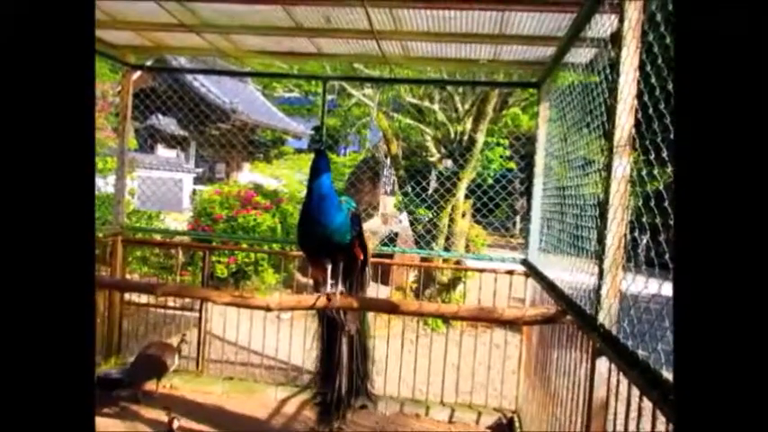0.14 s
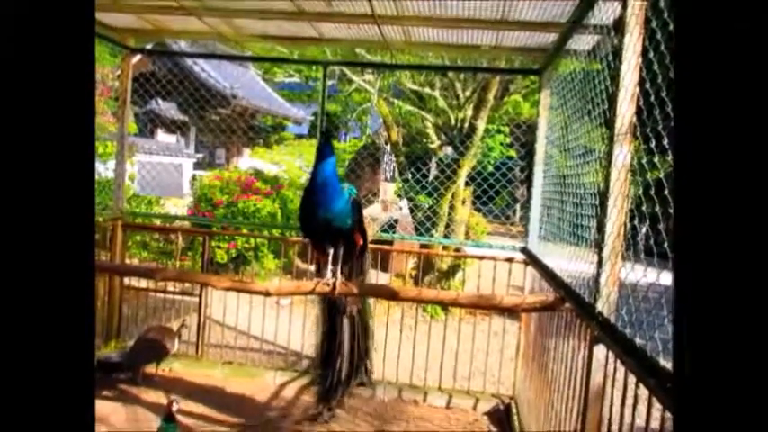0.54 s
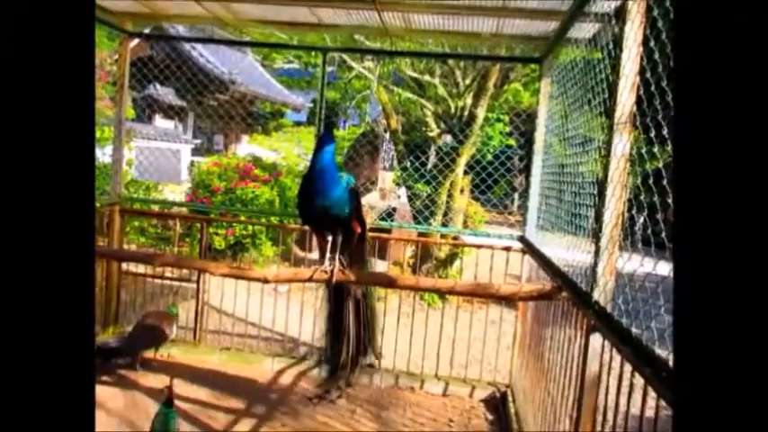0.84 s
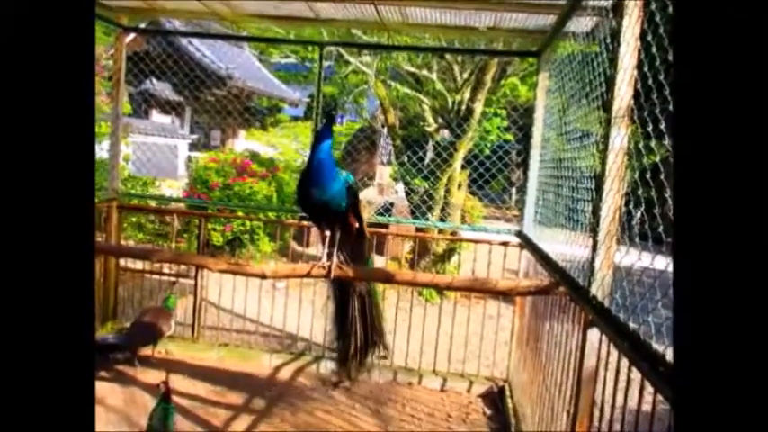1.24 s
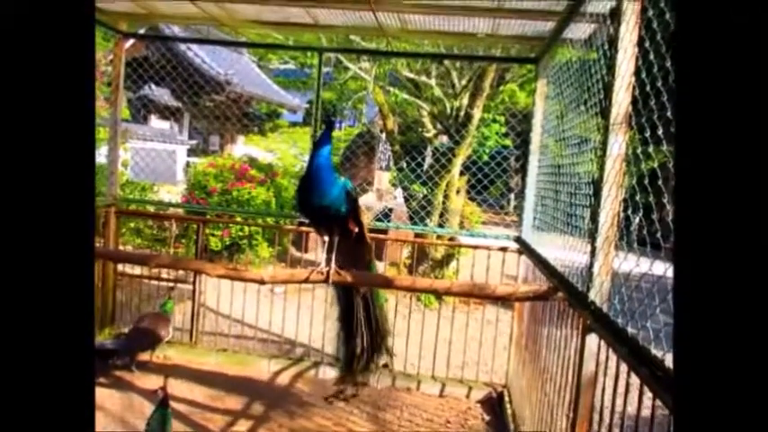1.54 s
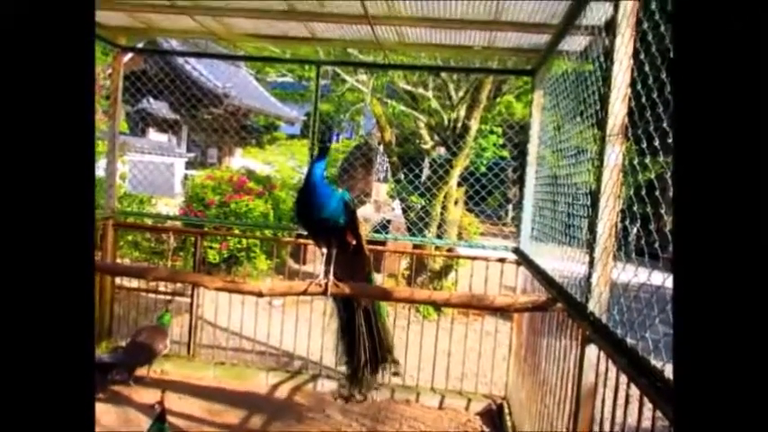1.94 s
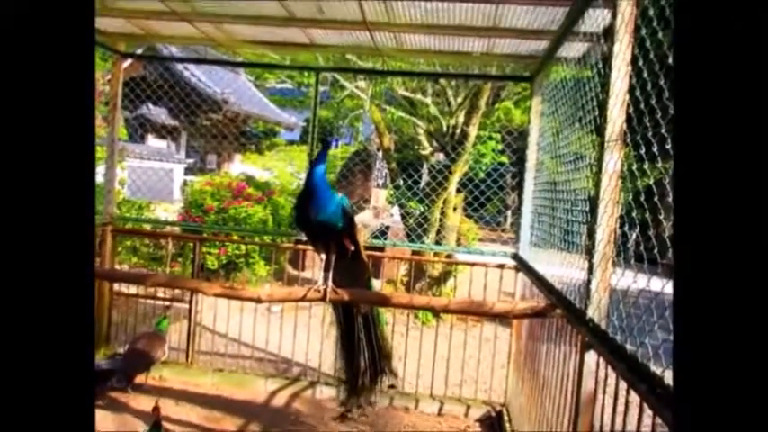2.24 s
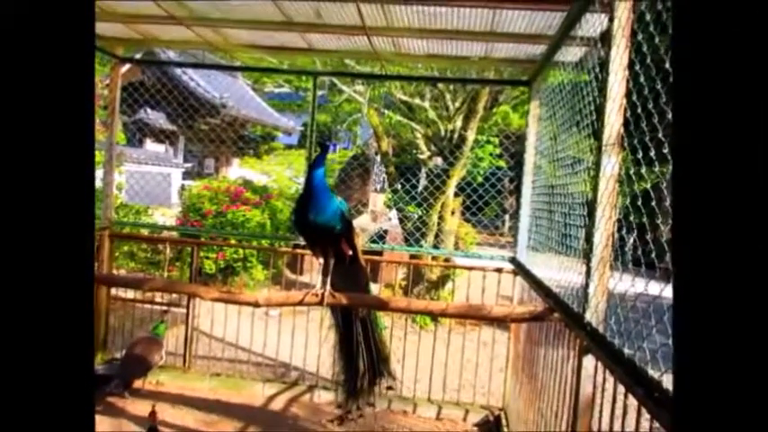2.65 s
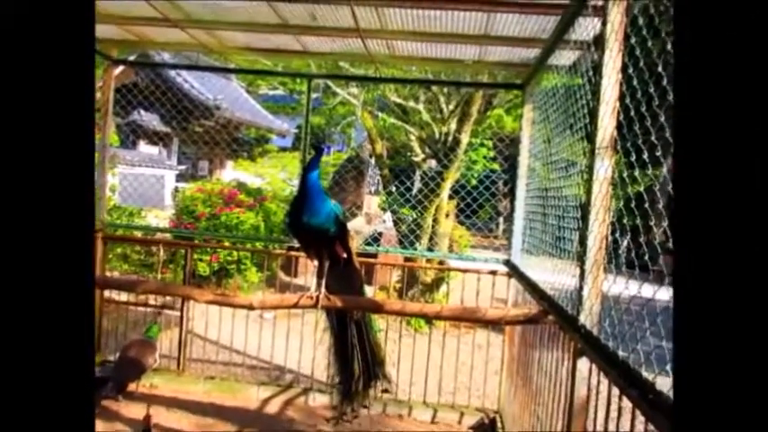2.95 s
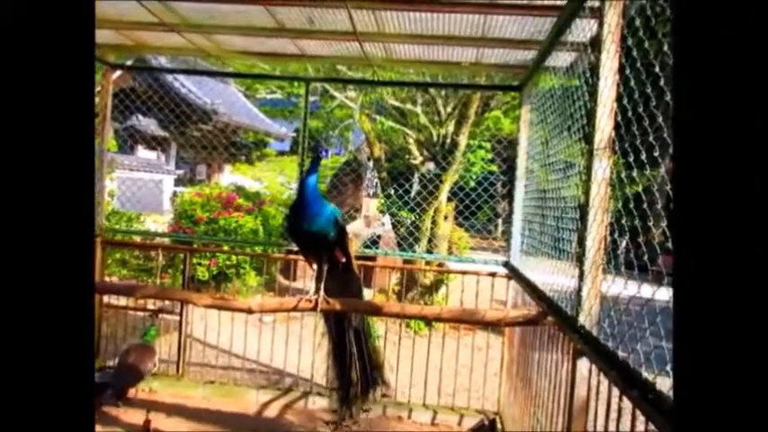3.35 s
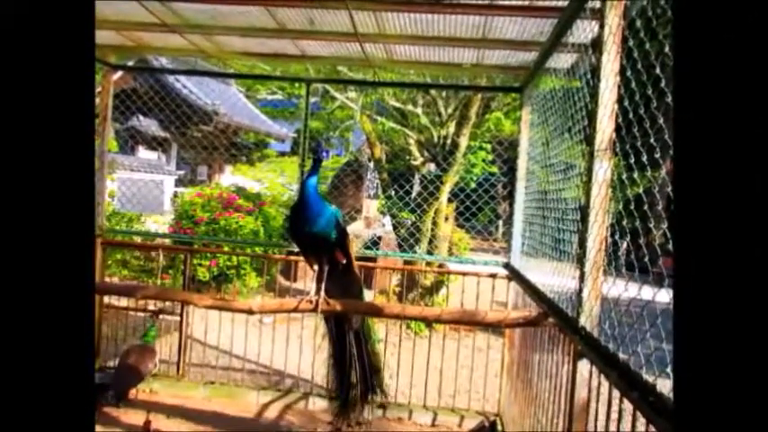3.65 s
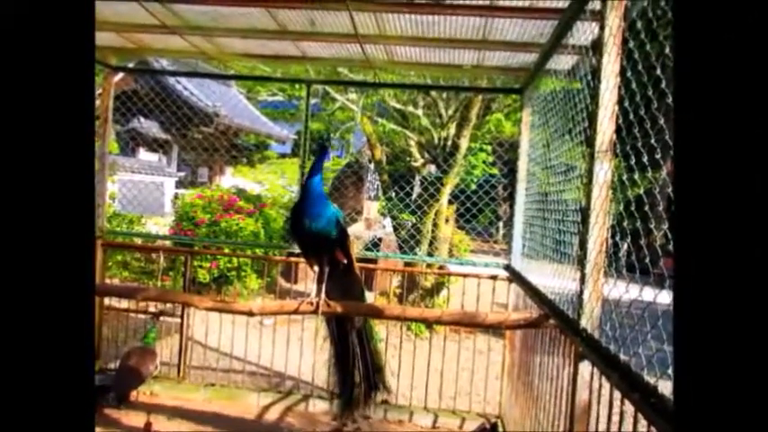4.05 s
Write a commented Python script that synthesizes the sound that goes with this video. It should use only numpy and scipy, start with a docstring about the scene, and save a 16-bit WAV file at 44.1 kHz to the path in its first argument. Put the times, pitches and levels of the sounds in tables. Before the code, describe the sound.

A close, loud peacock calls over soft background noise that becomes fainter early on. First come clipped nasal honks, a burst of air and sharp yelps, then a hoarse, trembling short cry. After a brief gap it wails twice, nasal at first and then higher and open, with a quiet pause between. Hard surfaces nearby add quick reflections and a light outdoor tail.

```python
"""Background noise rumbles and hisses; from a perch in a wire-mesh aviary a peacock gives a nasal double honk,
then coughs of air around a double yelp, while the background noise drops to a fainter level and stays there.
A short fluttering cry follows, then two long two-syllable wails that break upward and collapse at the end.
The voice is a stack of harmonics weighted by throat and beak, roughened by uneven cycles and hissing air;
each call is followed by early echoes, a brief dense scatter and a long faint ring."""
import sys
import numpy as np
from scipy import signal
from scipy.fft import rfft, irfft
from scipy.io import wavfile

SR = 44100
rng = np.random.default_rng(int(sys.argv[2]) if len(sys.argv) > 2 else 0)


def unload_audio(sound):
    """Save the sound as a 16-bit wav file, at the path given as the first command line argument."""
    columns = np.transpose(np.atleast_2d(sound))
    # keep every value between -1 and 1, then stretch to whole-number steps
    steps = np.round(np.clip(columns, -1, 1) * 32767)
    wavfile.write(sys.argv[1], SR, steps.astype(np.int16))


N = 185440
TIME = np.arange(N) / SR

# relative weights of the upper harmonics in the clipped notes and the short cry: f/Hz, level/dB
CRY_TREBLE_COLOUR = [(4000, 11.5), (5100, -8.5), (5800, -4.5), (6400, -12.5), (7200, -4), (8000, -8),
                     (9000, -9), (11500, -10.5), (14500, -27.5), (15500, -31.5)]

# settings shared by the cries: the quick attack, and the collapse of pitch and roughness at the end
CRY_ATTACK_DB = 9.5
COLLAPSE_S, COLLAPSE_HZ, COLLAPSE_ROUGH = 0.016, 63.6, 0.24


def from_db(db):
    """Decibels become an amplitude ratio by the logarithmic law of level."""
    return 10 ** (np.asarray(db) / 20)


def rms_one(x):
    """Normalises a signal to unit mean-square power."""
    return x / np.sqrt(np.mean(x ** 2) + 1e-20)


def at_hz(points, hz):
    """Interpolates a spectrum in dB along a logarithmic frequency axis, on which octaves are equal steps."""
    f, db = np.transpose(points)
    return np.interp(np.log(np.maximum(hz, 1)), np.log(f), db)


def butter(x, hz, kind, order=2):
    """Linear filtering with a maximally flat passband."""
    return signal.sosfilt(signal.butter(order, hz, kind, fs=SR, output="sos"), x)


def coloured_noise(spectrum, size=N):
    """Spectral shaping: white noise is weighted in frequency and brought to rms 1."""
    hz = np.fft.rfftfreq(size, 1 / SR)
    white = rfft(rng.standard_normal(size))
    return rms_one(irfft(white * from_db(at_hz(spectrum, hz)), size))


def wobble(rate_hz, size):
    """Low-passed noise as a random modulator, at most one second long, with rms 1 over that second."""
    slow = butter(rng.standard_normal(SR + SR // 4), rate_hz, "low")
    return rms_one(slow[-SR:])[:size]


def share(weights):
    """Power addition: scales a group of harmonics to a joint power of 1."""
    return weights / np.sqrt(np.sum(weights ** 2, axis=0) + 1e-20)


def ramp(t, start, length):
    """A linear transition from 0 to 1 over a given time."""
    return np.clip((t - start) / length, 0, 1)


def bump(t, centre, half_length):
    """A Gaussian swell of height 1; half_length is its standard deviation."""
    return np.exp(-((t - centre) / half_length) ** 2 / 2)


def blend(a, b, amount):
    """Linear interpolation from a to b as the amount goes from 0 to 1."""
    return a + (b - a) * amount


def between(start, end):
    """The sample times of one call on the discrete time axis."""
    return TIME[(TIME >= start) & (TIME <= end)]


def background():
    """Broadband ambient noise, low-passed more once its level drops, with a faint narrow-band drone."""
    # relative spectral density of the background noise: f/Hz, level/dB per Hz
    background_colour = [(25, -25), (60, 3), (90, -9.5), (118, 2), (150, -3.5), (290, 2.5), (430, -7.5),
                         (1100, -7.5), (2200, -11), (3600, -16), (5500, -26.5), (10500, -30),
                         (13000, -44.5), (15500, -47.5)]
    dropped = ramp(TIME, 0.62, 0.057)
    level = from_db(blend(-42.5, -58.5, dropped))
    air = coloured_noise(background_colour)
    dull = butter(air, 8300, "low", order=1)
    brightness = level / level.max()
    drone = rms_one(butter(rng.standard_normal(N + SR), [60, 69], "band")[SR:])
    return level * (dull + brightness * (air - dull)) + from_db(-80.0) * drone


def call(t, controls, treble_colour, beak_width_at_2800_hz, jitter, rasp,
         flutter=0., flutter_hz=39., crest_s=0., doubling_db=-70, waver_depth_db=2.0):
    """Source and filter: the syrinx buzzes, throat and beak weight its harmonics, strain roughens the cycles."""
    # relative spectral density of the hiss of air in the throat: f/Hz, level/dB per Hz
    air_colour = [(150, -17), (600, -8.5), (1400, -11), (2800, -4.5), (4500, 4), (8000, 3.5), (11500, -2),
                  (15000, -13.5)]
    attack_s, release_s = .003, 0.0035
    notch_hz, notch_width_hz, notch_db = 3970, 75, 12
    span = (TIME >= t[0]) & (TIME <= t[-1])
    size = len(t)
    pitch, level_db, low_db, octave_db, beak_hz, beak_db, treble_db, rough = controls

    # in a flutter the membranes tighten slowly and slip back; they also tremble at random
    turn = 2 * np.pi * flutter_hz * (t - crest_s)
    slip = (flutter > 0) * ((1 + np.cos(turn)) / 2) ** 2
    pitch = pitch * (1 - flutter * (np.sin(turn) + 0.55 * np.sin(2 * turn)))
    rough = rough + 0.035 * slip
    trembling_pitch = pitch * (1 + jitter * rough * wobble(180, size))
    phase = 2 * np.pi * np.cumsum(trembling_pitch) / SR
    k = np.arange(1, 27)[:, None]   # harmonic numbers
    hz = k * pitch

    # the beak resonance picks out the middle harmonics, whose levels waver slowly and independently
    beak_width = beak_width_at_2800_hz * (beak_hz / 2800) ** 2   # sharper the lower it lies
    waver_db = waver_depth_db * np.array([wobble(16, size) for _ in k])
    resonance = 1 / (1 + ((hz - beak_hz) / beak_width) ** 2)
    below_treble = 1 / (1 + (hz / 3620) ** 20)
    beak = share((k > 2) * from_db(waver_db) * resonance * below_treble)

    # above it stands a comb that brightens as the pitch first climbs, and dulls on any low note
    octaves_up = np.log2(hz / 4200)
    slack_db = -4.0 * np.clip((760 - np.maximum.accumulate(pitch)) / 100, 0, 2) * octaves_up
    slack_db += -2.5 * np.clip((690 - pitch) / 60, 0, 2) * octaves_up
    above_beak = 1 / (1 + (4280 / hz) ** 20)
    treble = share(from_db(at_hz(treble_colour, hz) + slack_db + waver_db) * above_beak)

    # every slip of the membranes weakens the harmonics above the fundamental
    height = (k == 1) * from_db(low_db) + (k == 2) * from_db(octave_db - 4.0 * slip)
    height = height + beak * from_db(beak_db - 7 * slip) + treble * from_db(treble_db - 6.8 * slip)
    # any harmonic passing near 4 kHz is weakened by a narrow notch
    height = height * from_db(-notch_db * bump(hz, notch_hz, notch_width_hz))
    # each harmonic starts at a random phase, so the wave is full rather than spiky
    harmonics = np.cos(k * phase + rng.uniform(0, 2 * np.pi, k.shape))
    voice = np.sqrt(2) * np.sum(height * harmonics, axis=0)

    # uneven cycles put skirts on the lines, and air hisses through on every opening
    voice *= 1 + 0.074 * rough * wobble(110, size)
    air = coloured_noise(air_colour, size=SR)[:size] * (1 + np.cos(phase))
    voice += rasp * rough * from_db(treble_db - 10 * slip) * air

    # late on a high note, alternate cycles differ: faint lines halfway between the harmonics
    progress = (t - t[0]) / (t[-1] - t[0])
    strain = np.clip((pitch - 740) / 50, 0, 1) * ramp(progress, .5, 0.12)
    half_lines = np.cos(5 / 2 * phase) + .45 * np.cos(7 / 2 * phase) + .45 * np.cos(11 / 2 * phase)
    voice += from_db(doubling_db) * strain * half_lines

    out = np.zeros(N)
    release = np.clip((t[-1] - t) / release_s, 0, 1)
    out[span] = voice * from_db(level_db) * ramp(t, t[0], attack_s) * release
    return out


def scrape(s, level_db, half_length_s, centre_hz):
    """Chaotic vibration: where the voice catches or changes register, band-passed noise rasps briefly."""
    band = [.82 * centre_hz, 1.2 * centre_hz]
    hiss = rms_one(butter(rng.standard_normal(N), band, "band"))
    return from_db(level_db) * bump(TIME, s, half_length_s) * hiss


def notes():
    """Damped harmonic tones: honks and yelps start with a scrape, hold briefly and fade as the pitch sags."""
    # a double honk and a double yelp: start t/s, hold t/s, fade/(dB per s), starting pitch f/Hz,
    # fundamental level/dB, octave level/dB, beak resonance f/Hz, beak level/dB, treble level/dB,
    # roughness (0-1), opening scrape level/dB
    note_table = [(0.310, 0.0039, 800, 612, -19.5, -18.5, 1790, -27, -41.5, 0.42, -34.5),
                  (0.346, 0.0013, 803.5, 592.5, -19.5, -5.5, 2080, -41, -37, 0.37, -44),
                  (0.599, 0.0017, 800.5, 684, -16.5, -5, 2360, -12, -30.5, .55, -22),
                  (0.620, .012, 902, 634, -23, -11, 2020, -14, -33, .25, -34.5)]
    length_s, sag_hz_per_s = .05, 830
    scrape_half_s, scrape_hz = .0025, 7940
    out = np.zeros(N)
    for start, hold, fade, hz, *voice, scrape_db in note_table:
        t = between(start, start + length_s)
        pitch = hz - sag_hz_per_s * (t - start)
        level_db = -fade * np.maximum(t - start - hold, 0)
        out += call(t, (pitch, level_db, *voice), CRY_TREBLE_COLOUR,
                    beak_width_at_2800_hz=250, jitter=0.059, rasp=1.3)
        out += scrape(start + 2 * scrape_half_s, scrape_db, scrape_half_s, scrape_hz)
    return out


def aviary(x):
    """Reflection and reverberation: slats and mesh mirror short waves; dense scatter and a faint ring decay."""
    # echoes off roof, floor and frame: delay t/s, gain (ratio, applied to the high-passed sound)
    echo_table = [(.0025, 0.22), (.0038, 0.033), (.0076, 0.062), (0.0103, 0.14), (0.0122, 0.21),
                  (.0193, 0.23), (0.0269, 0.027)]
    # relative spectrum of the lingering ring: f/Hz, level/dB
    ring_colour = [(200, -7.5), (750, -11), (1100, -4.5), (1550, -2.5), (2000, -6), (2600, -7.5),
                   (5000, -13.5), (9000, -29), (15000, -48)]
    scatter_db, scatter_t60_s = -11, .18
    ring_db, ring_t60_s = -30, 1.45
    t = TIME[:2 * SR]
    mirrored = butter(x, 2000, "high", order=1)
    echoes = sum(gain * np.interp(TIME - delay, TIME, mirrored, left=0) for delay, gain in echo_table)
    scatter = butter(rng.standard_normal(len(t)), [1300, 8000], "band", order=1)
    scatter = scatter * from_db(-60 * t / scatter_t60_s) * (t > .005)
    ring = coloured_noise(ring_colour, size=len(t))
    ring = ring * from_db(-60 * t / ring_t60_s) * ramp(t, 0, 0.029)

    # each tail is scaled by its rms gain across the core of the voice
    hz = np.fft.rfftfreq(len(t), 1 / SR)
    core = (hz > 1200) & (hz < 5000)

    def unit_gain(tail):
        """Normalises the transfer function to unit mean-square gain in the core band."""
        return tail / np.sqrt(np.mean(np.abs(rfft(tail)[core]) ** 2))

    tail = from_db(scatter_db) * unit_gain(scatter) + from_db(ring_db) * unit_gain(ring)
    return x + echoes + signal.fftconvolve(x, tail)[:N]


def coughs():
    """Turbulent noise: sudden puffs of air die exponentially, and the narrow throat adds a band-passed squeak."""
    # puffs of air: t/s, level/dB, decay time constant t/s
    puff_table = [(0.543, -8.5, 0.011), (0.595, -20.5, 0.0078), (0.743, -34, 0.026)]
    # relative spectral density of the puffs: f/Hz, level/dB per Hz
    cough_colour = [(60, -41), (200, -12), (450, -13.5), (650, 1.5), (1250, -1), (2000, -9.5), (3600, -3.5),
                    (4500, -14), (6000, -22.5), (9000, -23.5), (13000, -31), (15500, -40)]
    force = np.zeros(N)
    for s, db, decay in puff_table:
        onset = ramp(TIME, s, 0.00033)
        force += from_db(db) * onset * np.exp(-np.abs(TIME - s) / decay)
    squeak = rms_one(butter(rng.standard_normal(N), [3750, 4200], "band"))
    squeak = squeak * bump(TIME, .595, 0.0049)
    return force * coloured_noise(cough_colour) + from_db(-24) * squeak


def short_cry():
    """Frequency modulation: a fluttering cry starts hoarse, clears and tires; the beak opens and shuts around it."""
    # pitch before flutter and the final collapse: t/s, f/Hz
    cry_pitch = [(0.77, 660), (0.79, 695.3), (0.828, 701), (0.838, 711), (0.856, 726.8), (0.944, 730.2),
                 (0.988, 704.3), (1.058, 698), (1.075, 659)]
    start, end = .766, 1.088
    fundamental_db, octave_db, treble_db = -24, -11, -23.5
    shut_hz, shut_db, shut_treble_db = 2250, -14, -5   # the last is relative to treble_db
    open_hz, open_db = 2900, -20.0
    opens_s, shuts_s = 0.02, .025   # the shutting movement takes the first half of shuts_s
    tires_s, fade_db_per_s = 0.92, 36.5
    hoarse, clear = 0.54, .09   # roughness 0-1

    t = between(start, end)
    collapse = ramp(t, end - COLLAPSE_S, COLLAPSE_S)
    opened = ramp(t, start, opens_s) - ramp(t, end - shuts_s, shuts_s / 2)
    # it weakens as the air runs out
    tired_db = -fade_db_per_s * np.maximum(t - tires_s, 0)
    pitch = np.interp(t, *np.transpose(cry_pitch)) - COLLAPSE_HZ * collapse
    level_db = -CRY_ATTACK_DB * (1 - ramp(t, start, 0.0099)) - 6.5 * collapse
    rough = blend(hoarse, clear, ramp(t, .87 - .04, 0.12)) + COLLAPSE_ROUGH * collapse
    beak_hz = blend(shut_hz, open_hz, opened)
    beak_db = blend(shut_db, open_db + tired_db, opened)
    treble_db = treble_db + blend(shut_treble_db, tired_db, opened)
    controls = (pitch, level_db, fundamental_db, octave_db + tired_db, beak_hz, beak_db, treble_db, rough)
    # flutter is a share of the pitch; crest_s is the time of one crest of the slip
    voice = call(t, controls, CRY_TREBLE_COLOUR, beak_width_at_2800_hz=2200, jitter=.028, rasp=.5,
                 flutter=.012, flutter_hz=39.37, crest_s=.921, waver_depth_db=3.0)
    return voice + scrape(start + 0.014, level_db=-21, half_length_s=0.0072, centre_hz=9000)


def wail(start, swell_s, end, nasal_db, gaping_db, top_treble_db, doubling_db, pitch_curve):
    """Register break and moving resonance: a nasal syllable leaps into an open one; beak shuts, voice collapses."""
    # relative weights of the upper harmonics: f/Hz, level/dB
    wail_treble = [(4000, 13.5), (4650, -4), (5500, -2), (6300, -5), (7100, -5), (7950, -3.5), (8700, -7.5),
                   (10400, -9), (11300, -12), (13600, -14.5), (14400, -18), (15200, -32)]
    # how strongly the two lowest harmonics carry at each frequency: f/Hz, level/dB
    fundamental_colour = [(560, -38), (615, -25.5), (650, -34.5), (688, -24), (722, -27), (765, -22),
                          (800, -17.5)]
    octave_colour = [(1120, -29.5), (1265, -19), (1315, -28.5), (1440, -12.5), (1520, -15), (1565, -15),
                     (1605, -19)]
    # first syllable: nasal, with a strong beak resonance that climbs with the pitch
    nasal_pitch_hz, nasal_beak_hz, beak_per_pitch, nasal_treble_db = 637.6, 2704, 9.1, -24
    # second syllable: midway the beak gapes, so its resonance rises and weakens
    open_beak_hz, open_beak_db, gaping_beak_hz = 2288, -22.5, 2956
    top_pitch_hz, treble_db_per_hz = 796.7, 0.086   # the treble grows with the pitch
    break_hz, break_length_s, dip_lead_s = 708, .02, 0.011
    shut_beak_hz, shut_beak_db = 1990, -12.5

    t = between(start, end)
    collapse = ramp(t, end - COLLAPSE_S, COLLAPSE_S)
    pitch = np.interp(t, *np.transpose(pitch_curve)) - COLLAPSE_HZ * collapse
    # the register breaks when the pitch first climbs past its threshold
    break_s = t[np.argmax(pitch > break_hz)]
    opened = ramp(t, break_s - break_length_s / 2, break_length_s)
    gape = ramp(t, break_s + .22, 0.097)
    shut = ramp(t, end - 0.043, 0.019)

    # a quick attack of the whole voice, then a slower swell of beak and treble
    level_db = -CRY_ATTACK_DB * (1 - ramp(t, start, 0.012)) - 13 * collapse
    swell_db = -11 * (1 - ramp(t, start, swell_s))

    # the beak resonance slackens and the treble dips just before the register changes
    dip_s = break_s - dip_lead_s
    nasal_hz = nasal_beak_hz + beak_per_pitch * (pitch - nasal_pitch_hz)
    beak_hz = blend(nasal_hz, blend(open_beak_hz, gaping_beak_hz, gape), opened)
    beak_db = blend(nasal_db + swell_db, blend(open_beak_db, gaping_db, gape), opened)
    beak_db = beak_db - 5 * bump(t, dip_s, break_length_s)
    open_treble_db = top_treble_db + treble_db_per_hz * (pitch - top_pitch_hz)
    treble_db = blend(nasal_treble_db + swell_db, open_treble_db, opened)
    treble_db = treble_db - 16.5 * bump(t, dip_s, break_length_s / 2)
    treble_db = treble_db + 3 * shut   # a last push of air as the beak shuts

    # roughness 0-1: a little throughout, more in the nasal syllable, at the break and at the end
    rough = .035 + .06 * (1 - opened) + 0.34 * bump(t, break_s, break_length_s)
    rough = rough + COLLAPSE_ROUGH * collapse
    controls = (pitch, level_db, at_hz(fundamental_colour, pitch), at_hz(octave_colour, 2 * pitch),
                blend(beak_hz, shut_beak_hz, shut), blend(beak_db, shut_beak_db, shut), treble_db, rough)
    voice = call(t, controls, wail_treble, beak_width_at_2800_hz=520, jitter=.02, rasp=.6,
                 doubling_db=doubling_db, waver_depth_db=blend(6, 4, opened))
    break_scrape = scrape(break_s, level_db=-30, half_length_s=.014, centre_hz=10200)
    end_scrape = scrape(end - .053, level_db=-30.5, half_length_s=.01, centre_hz=11300)
    return voice + break_scrape + end_scrape


def wails():
    """Superposition of the two wails, each with its own pitch contour."""
    # start t/s, swell t/s, end t/s, nasal beak level/dB, gaping beak level/dB,
    # treble level at the top pitch/dB, period doubling level/dB
    wail_table = [(1.361, .02, 2.130, -13, -28.5, -19.5, -51.5),
                  (2.956, 0.072, 3.768, -12.5, -32, -20.5, -49)]
    # one contour a wail, a low arch and then a high one, before the final collapse: t/s, f/Hz
    pitch_curves = [
        [(1.365, 571.4), (1.401, 617.4), (1.439, 639.4), (1.481, 656.5), (1.529, 644.3), (1.563, 720.6),
         (1.679, 770.4), (1.769, 786.4), (1.861, 793.6), (1.931, 791), (1.991, 775.8), (2.043, 730.5),
         (2.063, 720.4), (2.097, 687), (2.118, 645)],
        [(2.96, 578.5), (2.974, 593.7), (3.052, 682.4), (3.09, 694.5), (3.14, 650), (3.158, 660), (3.17, 707),
         (3.18, 719), (3.196, 754), (3.288, 792.6), (3.38, 799.9), (3.57, 785), (3.618, 768.5), (3.7, 706.3),
         (3.755, 641)],
    ]
    return sum(wail(*row, curve) for row, curve in zip(wail_table, pitch_curves))


def scene():
    """Superposition: the bird's calls resound in the aviary, over the background noise."""
    bird = notes() + coughs() + short_cry() + wails()
    return (aviary(bird) + background())[None]


def record(dry):
    """Amplitude and band limiting: peaks beyond full scale are clipped, then a steep low-pass cuts the top."""
    lowpass = signal.ellip(12, .1, 90, 15300, fs=SR, output="sos")   # cutoff in Hz
    return signal.sosfilt(lowpass, np.clip(dry, -1, 1))


dry = scene()
out = record(dry)
unload_audio(out)
```